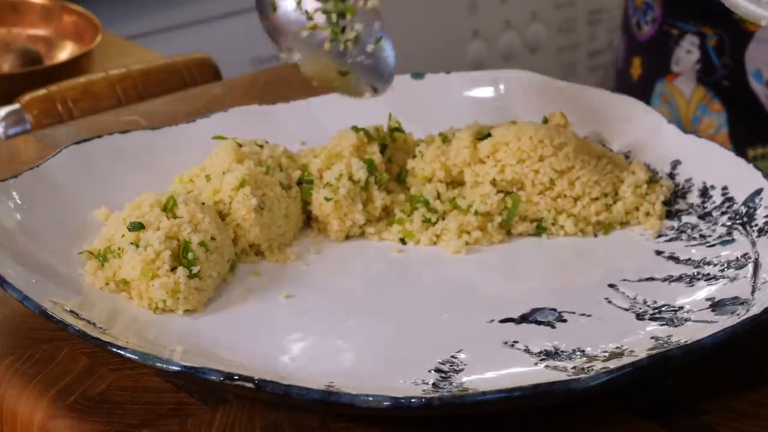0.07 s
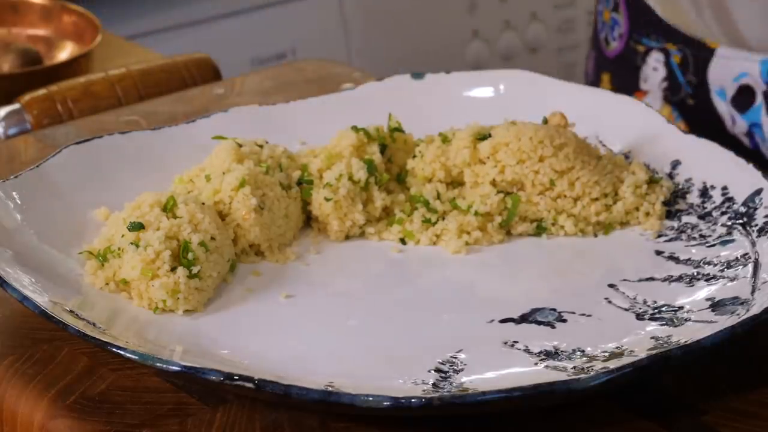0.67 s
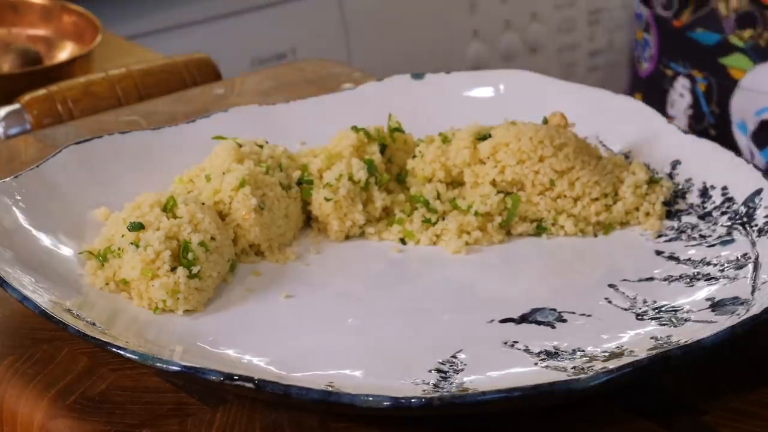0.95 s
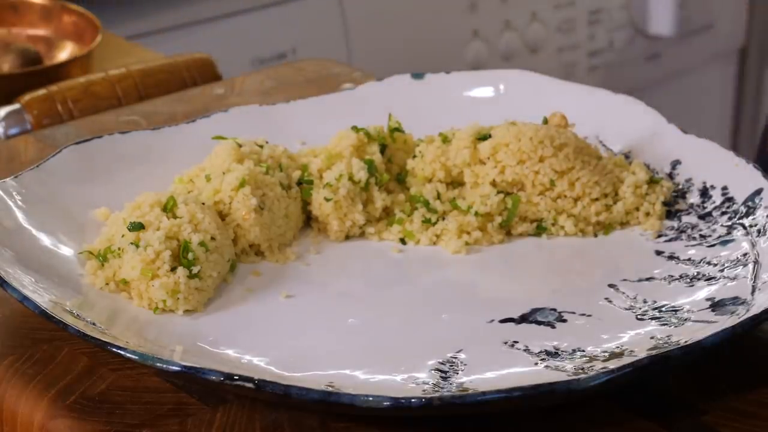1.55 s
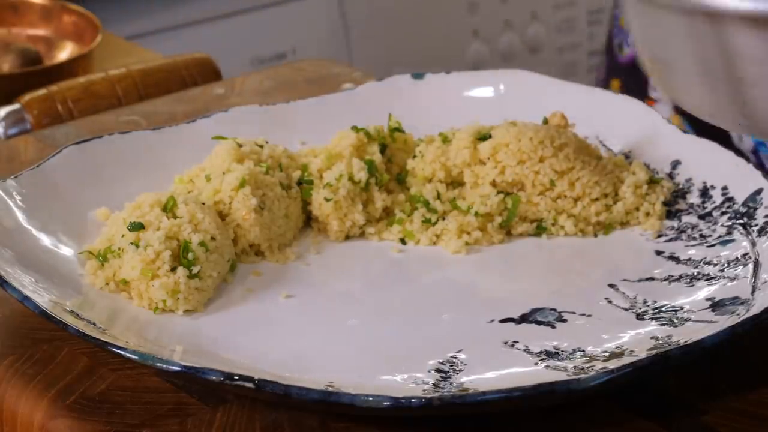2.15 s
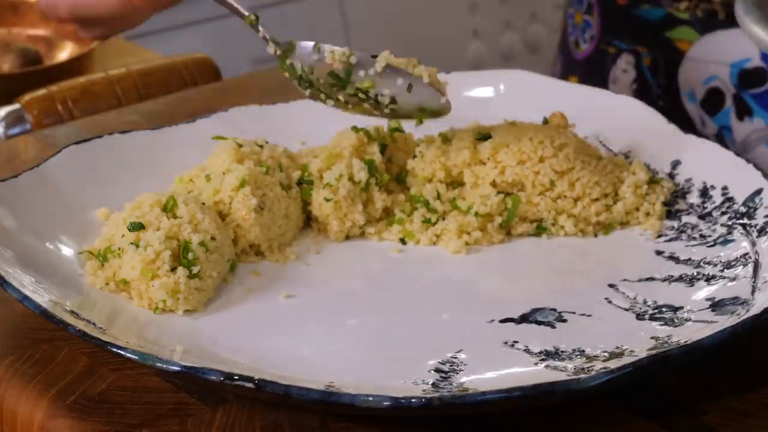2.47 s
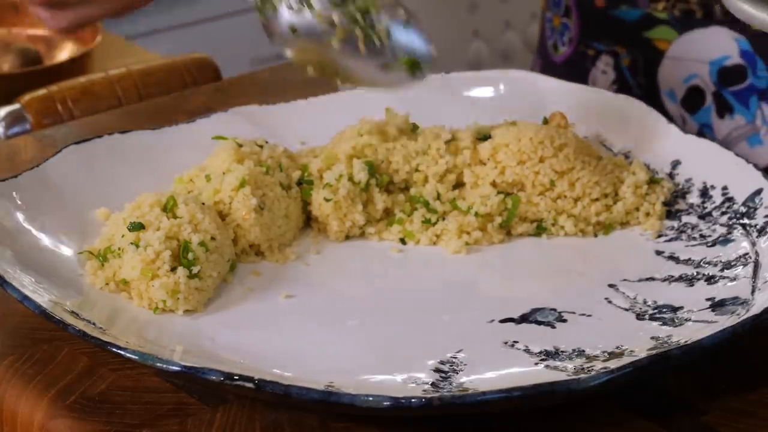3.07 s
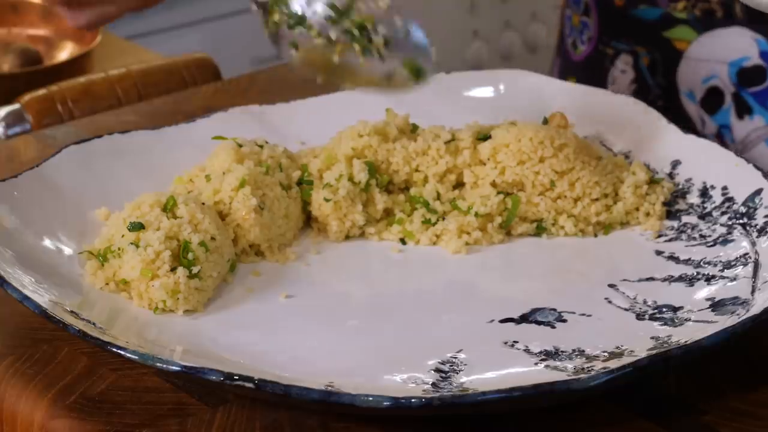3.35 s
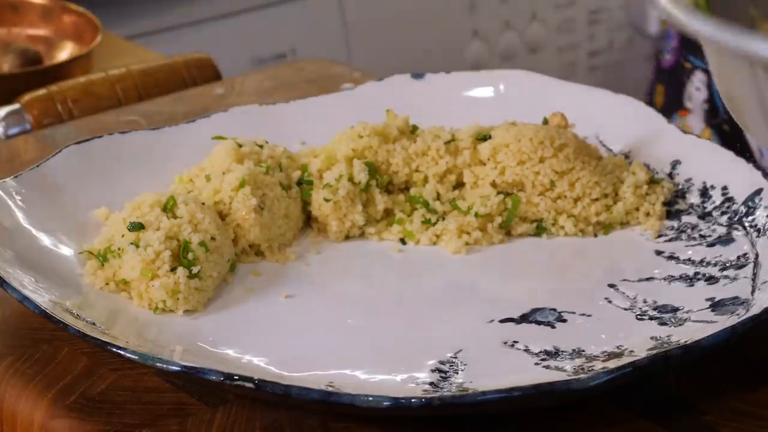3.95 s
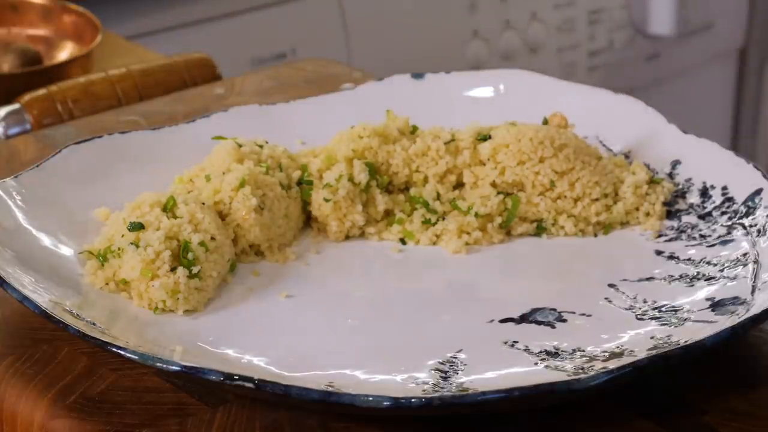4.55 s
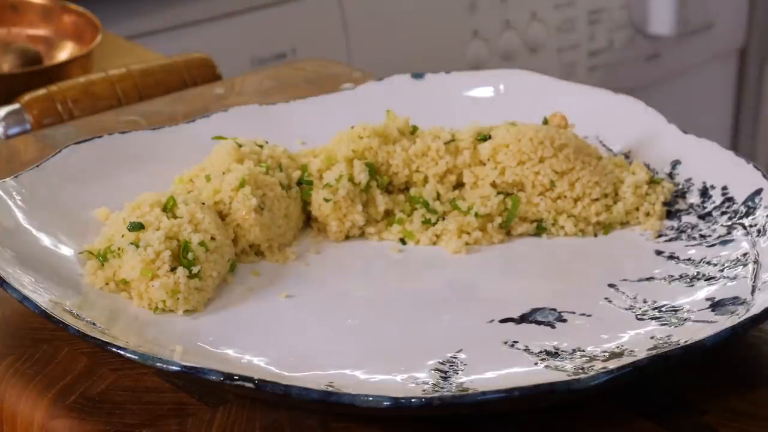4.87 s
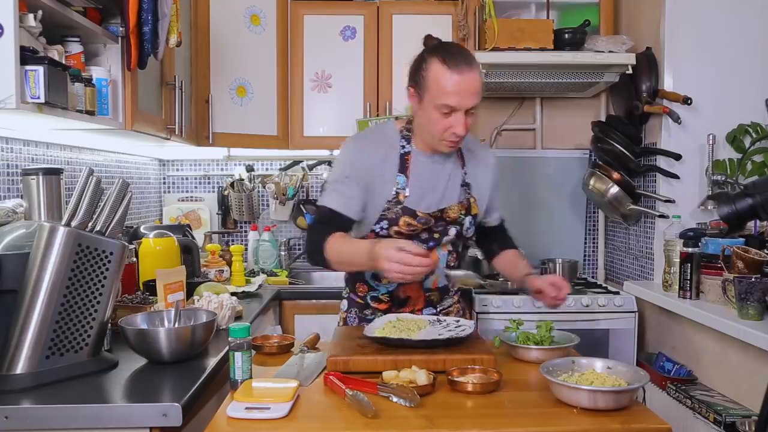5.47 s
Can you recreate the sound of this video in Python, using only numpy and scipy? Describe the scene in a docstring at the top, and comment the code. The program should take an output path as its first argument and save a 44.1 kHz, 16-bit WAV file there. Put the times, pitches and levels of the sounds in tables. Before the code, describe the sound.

A close microphone in a kitchen with a short reverberation picks up quiet air and a faint whirr throughout. Clothing rustles faintly from about 0.6 seconds, with a small tick at 1 second. Between 1.2 and 1.6 seconds a metal bowl knocks several times on a wooden table and slides with a short scrape, ending in a tiny squeak and a clack. From 1.9 to 3.9 seconds come scattered, very soft, dull pats and a few ticks as couscous is spooned onto a plate. At 4.1 seconds a spoon clatters into the bowl with a bright metallic ring and a low bump, then scuffs and skids lightly inside until 4.6. At about 4.75 seconds the bowl is set down with a loud thud; the table shudders and the spoon jumps and rattles, settling by 5 seconds. A soft bump, small ticks and faint cloth rustle follow until about 5.7 seconds.

```python
"""At a wooden kitchen table, couscous is served from a metal bowl onto a plate.
The bowl knocks on the wood and slides by stick-slip friction; a spoonful is patted softly into place.
The spoon clatters into the bowl, exciting its modes, skids in it, and jumps when the bowl is set down.
The table damps the bowl and shudders under it. Cloth rustles with each move of the arm,
and the kitchen adds a short reverberation over quiet air and a faint whirr."""
import sys
import numpy as np
from scipy import signal
from scipy.fft import rfft, irfft
from scipy.io import wavfile

SR = 44100
rng = np.random.default_rng(int(sys.argv[2]) if len(sys.argv) > 2 else 0)


def file_out(sig):
    """Save sig as 16-bit WAV at sys.argv[1]."""
    # one column per channel
    cols = np.atleast_2d(sig).T
    # limit, then scale
    lim = np.clip(cols, -1, 1)
    pcm = np.round(lim * 32767).astype(np.int16)
    wavfile.write(sys.argv[1], SR, pcm)


N = 251414
TIME = np.arange(N) / SR
AGE = TIME[:2 ** 15]   # seconds since an impact


def bowl_knocks(swell_s=0.0014, ping_t60_at_1khz_s=0.034, wash_db=-7.0, crack_db=9.5, crack_t60_s=0.0034):
    """Impact excites both bodies: the wood thuds, the rim pings and the damped bowl clacks."""
    # bowl meets table; the spot that lands picks the pitches:
    # start_s, thud_db, thud_hz, ping_db, ping_hz, clack_db, treble_db
    landings = [(1.2313, -17, 726, -14, 1826, -12, -11), (1.2346, -19, 573, -15.5, 1860, -21, -32),
                (1.341, -31.5, 597, -27, 1102, -23, -12.5), (1.449, -29, 1150, -13, 4650, -34, 11),
                (1.5515, -13.5, 775, -15.5, 7100, -27, 7.5), (1.5549, -18, 980, -21, 10900, -26, -21),
                (4.757, -4, 570, -16.5, 1720, -22.5, -18.5), (4.784, -20.5, 520, -39.5, 1036, -23, -5.5),
                (4.857, -28.5, 540, -51, 1110, -41, -6), (4.9054, -43, 610, -39, 1204, -40, -20)]
    # modes of the bowl damped by the table: pitch_hz, level_db, t60_s
    modes = [(326, -32.5, 0.055), (436, -9, 0.077), (526, -11, 0.048), (656, -24, 0.055),
             (770.5, -10.5, 0.099), (1023, -12.5, 0.12), (1280, -26.5, 0.24), (1860, -10, 0.075),
             (2030, -23, 0.11), (3100, -20, 0.091), (4090, -14, 0.073), (4650, -14.5, 0.057),
             (5000, -21.5, .16), (6800, -19.5, 0.073), (6410, -12, 0.065), (6700, -24.5, 0.061),
             (7770, -32, .07)]
    # its crowded, short-lived overtones: frequency_hz, density_db, t60_s
    bands = [(120, -5, .05), (300, -5, 0.051), (834, -6.5, 0.044), (1400, -3.5, 0.027), (2540, -3, 0.09),
             (6550, 6.5, 0.022), (13300, 0, 0.048), (16000, -10.5, 0.044)]
    out = np.zeros(N)
    for start_s, thud_db, thud_hz, ping_db, ping_hz, clack_db, treble_db in landings:
        thud = from_db(thud_db) * pulse(swell_s) * np.sin(2 * np.pi * thud_hz * AGE)
        ping_t60_s = ping_t60_at_1khz_s / np.sqrt(ping_hz / 1000)   # higher pings die sooner
        ping = from_db(ping_db) * decay(ping_t60_s) * np.sin(2 * np.pi * ping_hz * AGE)
        overtones = from_db(wash_db) * wash(bands) * (1 + from_db(crack_db) * decay(crack_t60_s))
        tones = ring(modes, beat_depth=0.72, split=0.012)
        clack = from_db(clack_db) * shelves(tones + overtones, treble_db, bass_db=0)
        add(out, start_s, thud + ping + clack)
    return out - low_pass(out, hz=228)


def spoon_clinks(set_down_s=4.757, wash_db=-7.0, crack_db=9.5, crack_t60_s=0.032, contact_t60_s=0.002):
    """Free vibration follows each bounce of the spoon; contact with the table dulls and damps it."""
    # spoon strikes bowl: start_s, level_db, treble_db, bass_db
    strikes = [(4.1141, -12, -6, 0.5), (4.128, -17.5, -1.5, -8), (4.1358, -19, -0.5, 0),
               (4.7741, -25, 4, -7.5), (4.7842, -43, 11.5, -16), (4.932, -43.5, -7, -8)]
    # modes of the free bowl and spoon: pitch_hz, level_db, t60_s
    modes = [(232, -34.5, 0.33), (659, -23, 0.15), (686, -25.5, 0.76), (757, -20, 0.91), (820, -22.5, 0.61),
             (1034, -26.5, 0.3), (1518, -16, 0.17), (1760, -36, 0.15), (2284, -9, 0.21),
             (2630, -36.5, 0.31), (3590, -22, 0.13), (4090, -15.5, 0.18), (4010, -13, 0.15),
             (4860, -8.5, 0.13), (4960, -12.5, 0.25), (4990, -14, 0.12), (7650, -19.5, .28),
             (7730, -27, 0.19), (7980, -20, 0.2), (8400, -16, 0.22), (8970, -24.5, 0.19),
             (9660, -16.5, 0.15), (10080, -26, 0.37), (10750, -16.5, 0.28), (12020, -27, .2),
             (14300, -22, .2), (14010, -25, .14), (14660, -21, .12)]
    # their crowded overtones: frequency_hz, density_db, t60_s
    bands = [(201.5, -17.5, 0.05), (445, 4, 0.08), (750, 4, 0.18), (1120, -17, 0.66), (1414, 1, 0.47),
             (1920, -8, 0.44), (2330, 1.5, 0.69), (3000, -5.5, 0.38), (4270, 4, 0.19), (5260, -1.5, 0.32),
             (7360, -7, 0.13), (8460, 0.5, 0.18), (11500, -5, .19), (15500, -1, .11)]
    out = np.zeros(N)
    for start_s, level_db, treble_db, bass_db in strikes:
        in_hand = start_s < set_down_s
        top_hz, damping_t60_s = (16400, 2.5) if in_hand else (8800, 1.1)
        overtones = from_db(wash_db) * wash(bands) * (1 + from_db(crack_db) * decay(crack_t60_s))
        tones = ring(modes, beat_depth=0.54, split=0.0046)
        hit = shelves(tones + overtones, treble_db, bass_db)
        envelope = (1 - decay(contact_t60_s)) * decay(damping_t60_s)
        add(out, start_s, from_db(level_db) * low_pass(hit * envelope, top_hz, order=2))
    return out


def table_top(bump_s=0.00071):
    """Structure-borne sound: hard blows pass through as deep bumps; the bowl's weight stirs low modes."""
    # blows through the wood: start_s, level_db
    bumps = [(1.233, -28.5), (1.5495, -58), (4.115, -21)]
    # the top shudders under the bowl: start_s, level_db
    shudders = [(4.766, -24.5), (4.924, -46.5)]
    # crowded modes of the top and the things on it: frequency_hz, density_db, t60_s
    bands = [(109, -25.5, 0.26), (128, 2.5, 0.82), (152, -10, .5), (177, 4.5, 0.64), (251, -0.5, 0.79),
             (310, -1, 0.32), (540, -7.5, 0.26), (840, 8.5, 0.2), (1150, 5.5, 0.23), (1650, -10.5, 0.14),
             (3000, -33, .2), (16000, -57, .1)]
    out = np.zeros(N)
    for start_s, level_db in bumps:
        add(out, start_s, from_db(level_db) * pulse(bump_s))
    for start_s, level_db in shudders:
        add(out, start_s, from_db(level_db) * wash(bands))
    return out - low_pass(out, hz=40)


def bowl_slide(speed_up_s=(1.455, 1.51), slow_db=-1.0, squeak_hz=5000):
    """Stick-slip on wood drives the bowl, higher and brighter as it gathers speed, ending in a squeak."""
    # one push of the hand: start_s, hold_s, level_db
    pushes = [(1.435, 0.081, -28)]
    # the foot catches hard on the wood: start_s, above_slips_db
    catches = [(1.4493, 25), (1.4598, 18), (1.4853, 13), (1.524, 14.5)]
    # resonances of the bowl at full speed: pitch_hz, width_hz, level_db
    peaks = [(272, 10, -16.5), (535, 39, 0), (616, 64, -11), (813, 45, -23), (1148, 103, 4.5),
             (1720, 105, -2.5), (2290, 430, 0), (3150, 110, -3), (3497, 250, 1.5), (4300, 250, -3.5),
             (4790, 210, 0), (6400, 160, -2), (8000, 990, -9), (10900, 310, -10), (12100, 1900, -15),
             (13700, 460, -17)]
    # the foot squeaks as the push ends: start_s, hold_s, level_db
    squeaks = [(1.515, 0.025, -35.5)]
    pressure = strokes(pushes, rise_db_per_s=524, fall_db_per_s=306)
    force = friction(pressure, catches, slips_per_s=2200, spread_db=2.5, catch_t60_s=0.0011)
    is_fast = rng.random(N) < np.interp(TIME, speed_up_s, [0, 1])
    slow = from_db(slow_db) * low_pass(body(force * ~is_fast, peaks, pitch_ratio=0.97), hz=4000)
    fast = body(force * is_fast, peaks)
    squeak_gain = strokes(squeaks, rise_db_per_s=900, fall_db_per_s=900)
    return slow + fast + squeak_gain * np.sin(2 * np.pi * squeak_hz * TIME)


def spoon_skid(turn_s=(4.35, 4.46), dull_db=2.0):
    """Light friction keeps the bowl ringing, brighter as the spoon turns from its back onto its edge."""
    # the spoon shifts with a quick scuff: start_s, hold_s, level_db
    scuffs = [(4.332, 0.00405, -40)]
    # it skids slowly round the wall: start_s, hold_s, level_db
    skids = [(4.55, .045, -45)]
    # its tip catches: start_s, above_slips_db
    catches = [(4.3325, 7), (4.561, 20), (4.572, 8), (4.598, 3)]
    # resonances of the rubbed bowl: pitch_hz, width_hz, level_db
    peaks = [(480, 65, -3), (720, 35, 3), (814, 30, 1), (1240, 91, 3.5), (1660, 200, -6.5), (1930, 100, 2),
             (2215, 27, 9), (2730, 250, -1.5), (3420, 240, -12.5), (3800, 62, 3.5), (4250, 39, 1),
             (5000, 100, 0.5), (6140, 150, -13), (8360, 230, -6.5), (10900, 360, -12.5), (13500, 2700, -26),
             (3000, 3250, -8.5)]
    pressure = strokes(scuffs, rise_db_per_s=484, fall_db_per_s=1104)
    pressure += strokes(skids, rise_db_per_s=58, fall_db_per_s=127.5)
    force = friction(pressure, catches, slips_per_s=1100, spread_db=1.5, catch_t60_s=0.011)
    bright = body(force, peaks)
    dull = from_db(dull_db) * low_pass(bright, hz=3500)
    on_edge = np.interp(TIME, turn_s, [0, 1])
    return on_edge * bright + (1 - on_edge) * dull


def soft_pats():
    """A soft impact excites mainly low modes, so it sounds dull."""
    # pats and handling bumps: start_s, level_db
    pats = [(.655, -50), (1.868, -50.5), (2.37, -50), (2.686, -50), (2.702, -55), (3.05, -52.5),
            (3.122, -57.5), (3.708, -55), (3.912, -52), (5.069, -41.5)]
    # spectrum and decay of a pat: frequency_hz, density_db, t60_s
    bands = [(102, -42, .05), (218, -6, 0.21), (328, 4, 0.051), (520, -9.5, 0.11), (903, -17, 0.055),
             (3000, -32.5, 0.032), (12000, -49, .03)]
    out = np.zeros(N)
    for start_s, level_db in pats:
        add(out, start_s, from_db(level_db) * wash(bands))
    return out


def small_ticks():
    """A brief noise burst through a resonance: a dry tick if the band is wide, a faint ping if narrow."""
    # ticks and pings of handling: start_s, peak_db, pitch_hz, width_hz, t60_s
    ticks = [(0.9919, -34, 6500, 1600, 0.0044), (2.405, -64, 1310, 30, .01), (3.513, -60.5, 3200, 90, .005),
             (3.795, -46, 8000, 9000, .003), (3.914, -50, 4000, 9000, .03), (5.01, -48, 7600, 3000, .04),
             (5.4675, -36, 1290, 5000, 0.00084), (5.625, -45.5, 3000, 9000, 0.0022)]
    out = np.zeros(N)
    for start_s, peak_db, pitch_hz, width_hz, t60_s in ticks:
        snap = rng.standard_normal(len(AGE)) * decay(t60_s)
        tick = resonate(resonate(snap, pitch_hz, width_hz), pitch_hz, width_hz)
        add(out, start_s, from_db(peak_db) * tick / np.abs(tick).max())
    return out


def cloth_rustle():
    """Friction of apron and sleeves makes broadband noise that follows the speed of the arm."""
    # moves of the arm: start_s, hold_s, level_db
    moves = [(.62, 0.41, -62), (2.02, 0.028, -63), (3.88, 0.14, -61.5), (5.38, .1, -58), (5.68, .02, -60.5)]
    # spectrum of rubbing cloth: frequency_hz, density_db
    spectrum = [(100, -1), (330, 11.5), (700, 6.5), (2000, -2.5), (5000, -7.5), (10000, -5.5),
                (16000, -7.5)]
    return strokes(moves, rise_db_per_s=61, fall_db_per_s=97) * noise(spectrum)


def kitchen_reverb(direct, wet_db=-9.0, first_echo_s=0.0017):
    """Reflections from cupboards and walls add a short diffuse tail to the direct sound."""
    # reverberation of the room: frequency_hz, density_db, t60_s
    bands = [(98.5, -15.5, 0.69), (394, 1, 0.36), (1001, 2, 0.22), (4000, 1.5, 0.32), (9000, 5, 0.28),
             (15980, 2.5, 0.24)]
    tail = wash(bands) * np.clip(AGE / first_echo_s - 1, 0, 1)
    return direct + from_db(wet_db) * signal.fftconvolve(direct, tail / np.linalg.norm(tail))[:N]


def room_tone(air_db=-62):
    """Stationary noise: a broad spectrum is heard as quiet air, narrow bands as a faint whirr."""
    # spectrum of the air: frequency_hz, density_db
    spectrum = [(15, -47), (25, -14.5), (48, -7), (70, -5.5), (185, -1), (301, 0), (335, 0.5), (591, -6.5),
                (1020, -10.5), (1290, -9.5), (1890, -12.5), (3250, -15.5), (3920, -15.5), (14000, -21),
                (16000, -24.5)]
    # bands of the whirr: pitch_hz, width_hz, level_db
    peaks = [(1312, 23, -79), (2837, 180, -79)]
    whirr = 0
    for pitch_hz, width_hz, level_db in peaks:
        whirr += from_db(level_db) * rms_one(resonate(rng.standard_normal(N), pitch_hz, width_hz))
    return from_db(air_db) * noise(spectrum) + whirr


def ring(modes, beat_depth, split, scatter_db=1.0):
    """Unevenly struck modes decay and beat: a bowl is never quite round, so each splits in two."""
    out = 0
    for k, (hz, db, t60_s) in enumerate(modes):
        beat_hz = hz * split * (1 + rng.random())
        beating = 1 + beat_depth * np.sin(2 * np.pi * (beat_hz * AGE + rng.random()))
        gain = (-1) ** k * from_db(db + scatter_db * rng.standard_normal())
        out += gain * beating * np.sin(2 * np.pi * hz * AGE) * decay(t60_s)
    return out


def wash(bands):
    """Modal overlap: countless modes merge into noise that starts at rms 1 and dies band by band."""
    hz, db, t60_s = np.transpose(bands)
    size = len(AGE)
    spectrum = rfft(rng.standard_normal(size)) * from_db(over_bins(hz, db, size))
    parts = np.array([irfft(spectrum * over_bins(hz, band, size)) for band in np.eye(len(hz))])
    return np.sum(parts * decay(t60_s[:, None]), axis=0) / parts.sum(axis=0).std()


def friction(pressure, catches, slips_per_s, spread_db, catch_t60_s):
    """Stick-slip force: random uneven impulses and a few hard catches, all scaled by pressure."""
    sizes = from_db(spread_db * np.minimum(rng.exponential(1, N), 4))
    signs = rng.choice([-1, 1], N)
    slipping = rng.random(N) < slips_per_s / SR
    force = rms_one(sizes * signs * slipping)
    for start_s, db in catches:
        add(force, start_s, from_db(db) * decay(catch_t60_s) * rng.choice([-1, 1], len(AGE)))
    return force * pressure


def body(force, peaks, pitch_ratio=1):
    """Forced vibration: a force drives parallel resonances, all shifted by one pitch ratio."""
    impulse = 1. * (AGE == 0)
    response = 0
    for k, (hz, width_hz, db) in enumerate(peaks):
        response += (-1) ** k * from_db(db) * resonate(impulse, hz * pitch_ratio, width_hz)
    return signal.fftconvolve(force, response / np.linalg.norm(response))[:N]


def strokes(moves, rise_db_per_s, fall_db_per_s):
    """Envelope of movements, summed in power: each is at full force by start_s, holds and eases off."""
    power = 0
    for start_s, hold_s, db in moves:
        early_s = np.maximum(start_s - TIME, 0)
        late_s = np.maximum(TIME - start_s - hold_s, 0)
        power += from_db(db - rise_db_per_s * early_s - fall_db_per_s * late_s) ** 2
    return np.sqrt(power + 1e-20)


def noise(spectrum):
    """White noise filtered to a spectrum; rms 1."""
    hz, db = np.transpose(spectrum)
    return rms_one(irfft(rfft(rng.standard_normal(N)) * from_db(over_bins(hz, db, N)), N))


def decay(t60_s):
    """Exponential decay from height 1."""
    return np.exp(-np.log(1000) * AGE / t60_s)


def pulse(peak_s):
    """A critically damped pulse that reaches height 1 and lets go."""
    return AGE / peak_s * np.exp(1 - AGE / peak_s)


def resonate(x, hz, width_hz):
    """A two-pole resonance with peak gain 1."""
    radius = np.exp(-np.pi * width_hz / SR)
    feedback = [1, -2 * radius * np.cos(2 * np.pi * hz / SR), radius ** 2]
    return signal.lfilter(np.array([1, 0, -1]) * (1 - radius ** 2) / 2, feedback, x)


def low_pass(x, hz, order=1):
    """A gentle roll-off above a corner frequency."""
    return signal.lfilter(*signal.butter(order, min(hz, .45 * SR), fs=SR), x)


def shelves(x, treble_db, bass_db, treble_hz=5000, bass_hz=600):
    """Shelving filters raise or lower the two ends of the spectrum."""
    x = x + (from_db(treble_db) - 1) * (x - low_pass(x, treble_hz))
    return x + (from_db(bass_db) - 1) * low_pass(x, bass_hz)


def over_bins(hz, values, size):
    """Interpolation over log frequency, at the bins of a transform."""
    return np.interp(np.log(np.fft.rfftfreq(size, 1 / SR) + 0.0011), np.log(hz), values)


def from_db(db):
    """Decibels to amplitude ratio."""
    return 10 ** (np.asarray(db) / 20)


def rms_one(x):
    """Normalisation to rms 1."""
    return x / np.sqrt(np.mean(x ** 2) + 1e-20)


def add(track, start_s, sound):
    """Superposition of a sound on a track."""
    start = round(start_s * SR)
    track[start:start + len(sound)] += sound[:N - start]


def scene():
    """All sources superpose at one close microphone."""
    direct = bowl_knocks() + table_top() + spoon_clinks() + bowl_slide() + spoon_skid()
    direct += cloth_rustle() + soft_pats() + small_ticks()
    return (kitchen_reverb(direct) + room_tone())[None]


def record(dry):
    """Band limiting: a steep low-pass filter removes the highest treble."""
    cutoff_hz = 15850
    return signal.sosfilt(signal.ellip(12, .1, 90, cutoff_hz, fs=SR, output="sos"), dry)


dry = scene()
out = record(dry)
file_out(out)
```